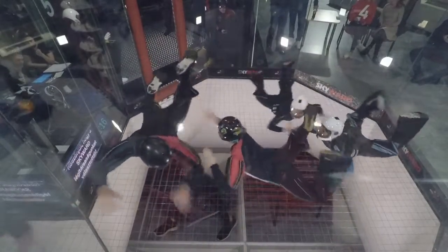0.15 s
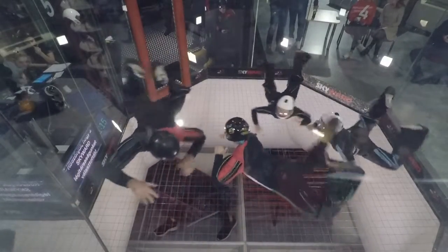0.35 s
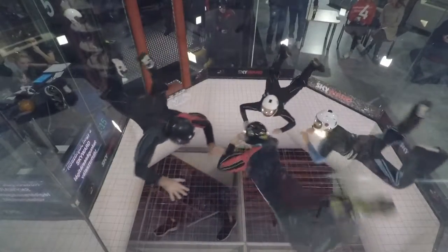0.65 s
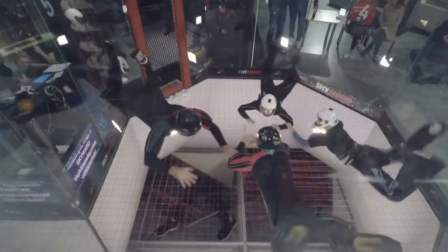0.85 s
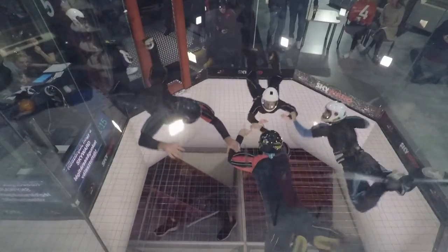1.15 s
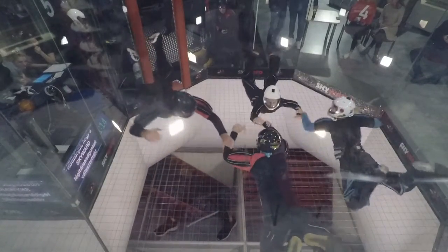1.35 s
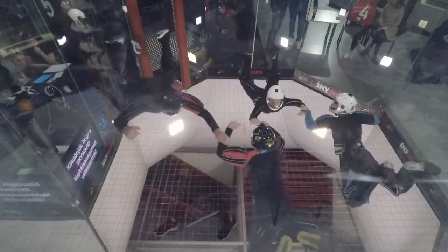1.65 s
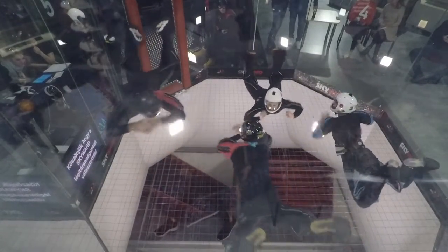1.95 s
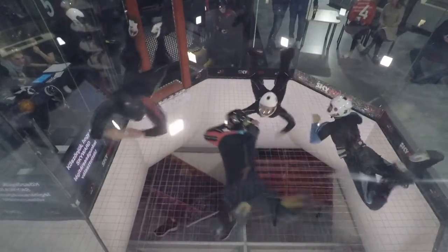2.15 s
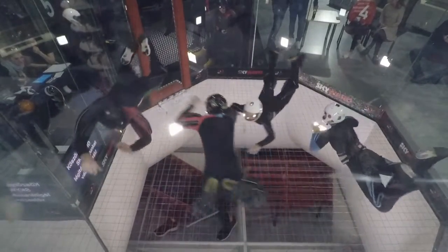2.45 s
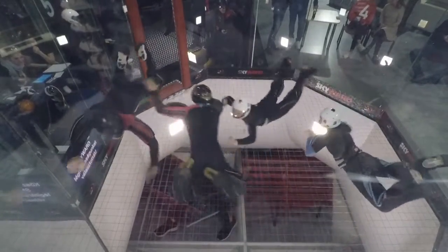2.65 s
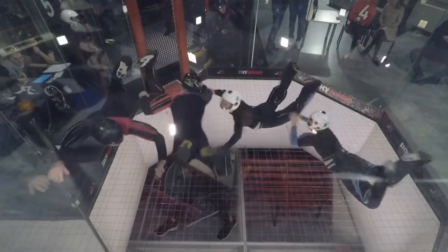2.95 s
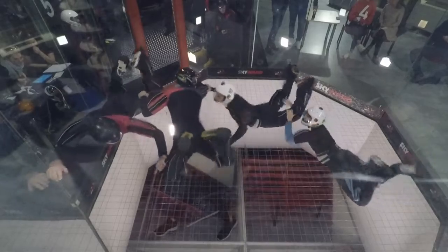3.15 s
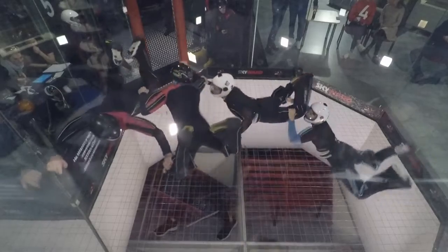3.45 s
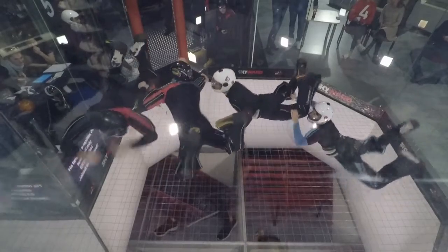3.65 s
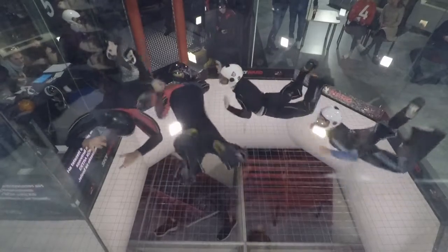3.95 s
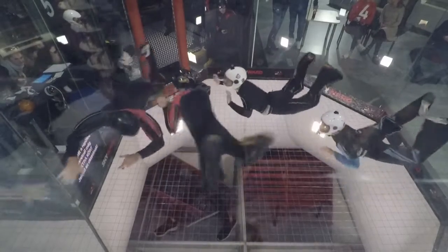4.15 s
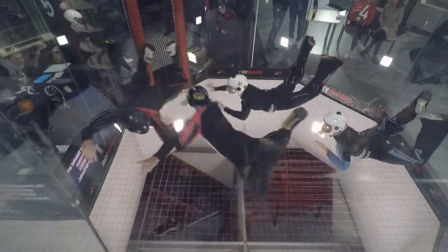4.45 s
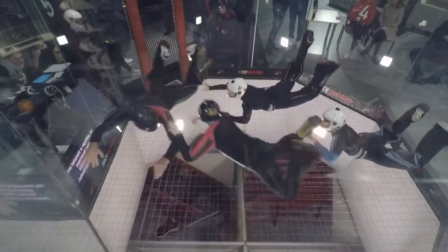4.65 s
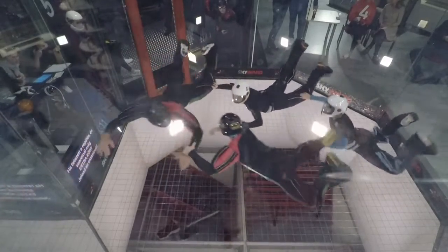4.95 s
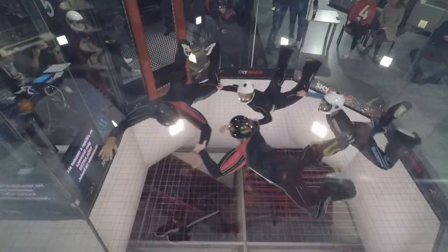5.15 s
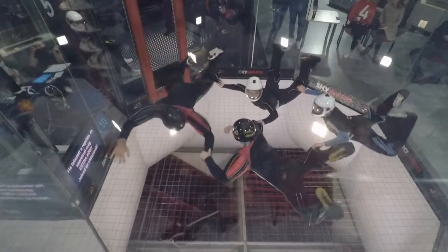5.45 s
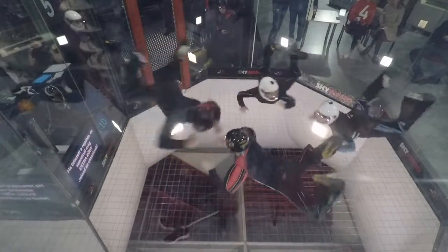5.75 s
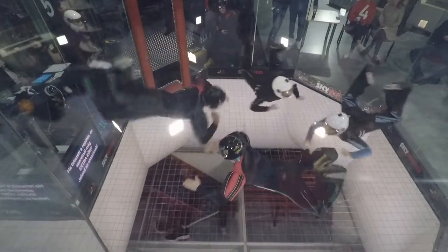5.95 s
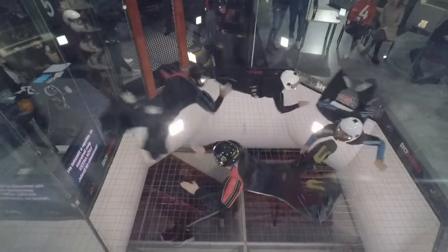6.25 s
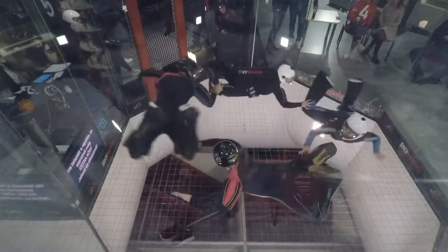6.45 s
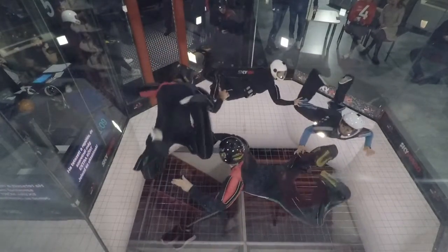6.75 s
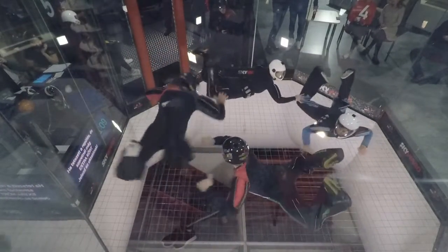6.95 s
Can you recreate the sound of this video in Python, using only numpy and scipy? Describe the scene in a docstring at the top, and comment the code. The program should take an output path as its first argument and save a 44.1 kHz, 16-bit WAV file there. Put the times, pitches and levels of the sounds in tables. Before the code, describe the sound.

From start to end, about seven seconds, air roars through a vertical wind tunnel at a steady speed. The sound is loud, deep and muffled, as the microphone sits in a closed housing at the chamber glass. The duct booms and flutters, with brief low swells around 0.8, 3.3 and 5 seconds. A low, wavering fan hum runs underneath and grows stronger from about 4 seconds on. Close by, a loose part ticks lightly and sharply throughout, roughly fifteen times a second, in an uneven rattle with short gaps, sparser between about 1.3 and 2.2 seconds. Just after 2 seconds, two brief, faint, high whistles of air follow one another. Very faint puffs of high hiss recur a little more than half a second apart, almost buried in the roar. The rush eases only slightly at the end.

```python
"""Air roaring through a vertical wind tunnel at steady speed, booming in the resonances of the duct.
The microphone sits in a closed camera housing at the glass of the flying chamber; the housing muffles
the treble. The fans hum at their blade rate, and the same vibration makes a loose part tick close by,
mostly twice per shaft turn. Two brief whistles and faint puffs of hiss lie under the roar."""
import sys
import numpy as np
from scipy import signal
from scipy.fft import rfft, irfft
from scipy.io import wavfile
from scipy.ndimage import uniform_filter1d, minimum_filter1d

SR = 44100
rng = np.random.default_rng(int(sys.argv[2]) if len(sys.argv) > 2 else 0)


def store_pcm(level_fs):
    """Save levels as 16-bit WAV."""
    pcm = np.round(np.clip(level_fs, -1, 1) * 32767).astype(np.int16)
    wavfile.write(sys.argv[1], SR, np.atleast_2d(pcm).T)


N = 312669

BLADE_HZ = 72.33  # fan blades passing per second


def undb(db):
    """Decibels to gain."""
    return 10 ** (np.asarray(db) / 20)


def bell(x, centre, width):
    """A smooth hump, 1 at the centre and 1/2 at half a width from it."""
    return 2. ** -(2 * (x - centre) / width) ** 2


def drift(rate_hz):
    """A smooth random wander with spread 1: levels held for 1 / rate_hz seconds and slewed twice."""
    hold = max(int(SR / rate_hz), 1)
    steps = np.repeat(rng.standard_normal(N // hold + 1), hold)
    smooth = uniform_filter1d(uniform_filter1d(steps, hold), hold)[:N]
    return smooth / smooth.std()


def shaped_noise(gain):
    """Noise with the given amplitude per root Hz on the frequency axis of rfft."""
    return irfft(rfft(rng.standard_normal(N)) * gain, N) * np.sqrt(SR / 2)


def noise_band(f, hz, width_hz):
    """A bell-shaped band of noise with rms 1."""
    band = shaped_noise(bell(f, hz, width_hz))
    return band / band.std()


def air_roar(f, t, gust_db=0.33, flicker_db=.5):
    """Turbulence coloured by duct and housing; it swells as a whole and eddies make each octave flicker."""
    # Turbulent air behind the housing wall. Each row: frequency in Hz, level in dB per Hz.
    air_spectrum = [(12, -42), (25, -40), (100, -43), (300, -43.5), (500, -47.5), (780, -45.5),
                    (1020, -48.5), (1200, -57.5), (1900, -72), (3400, -83.5), (4900, -81), (6200, -99),
                    (8000, -103), (15000, -105)]
    # Weaker resonances and notches of the duct. Each row: centre in Hz, width in Hz, lift in dB.
    duct_colour = [(40.8, 6.2, 8.5), (88.3, 10, 3), (100, 6.3, -7), (162.4, 16, -5), (239, 15, 0),
                   (292, 17, 1), (314.4, 16, 5), (378.5, 9.1, 3), (1090, 150, 1.2)]
    # Resonances of the housing's air and walls. Each row: centre in Hz, width in Hz, lift in dB.
    housing_colour = [(1765, 100, 4), (2270, 230, 4.5), (3010, 420, 6), (4305, 800, 7)]
    # Strength of the rush as the flyers move through the stream. Each row: time in seconds, gain in dB.
    flow = [(0, 0), (1.3, 0.1), (2.3, 0), (2.9, -0.5), (3.25, 0.5), (3.7, -0.7), (4.2, -1), (4.8, -0.5),
            (6.4, -0.05), (7.09, -1.5)]
    hz, db = np.transpose(air_spectrum)
    octave = np.log2(np.maximum(f, 1))
    colour_db = np.interp(octave, np.log2(hz), db)
    for centre, width, lift_db in duct_colour + housing_colour:
        colour_db = colour_db + lift_db * bell(f, centre, width)
    rush = 0
    for k in range(3, 15):  # octaves from 8 Hz up
        band = shaped_noise(undb(colour_db) * (np.floor(octave) == k))
        rush = rush + band * undb(flicker_db * drift(11))
    flow_db = np.interp(t, *np.transpose(flow))
    return rush * undb(flow_db + gust_db * drift(3.59))


def duct_buffeting(f, t, settle_s=0.097, swell_db=1.2):
    """Turbulence pumps the duct's strongest resonances; a large eddy takes hold of one for a moment."""
    # The three booming resonances. Each row: centre in Hz, width in Hz, level in dB.
    duct_modes = [(43.3, 17.4, -19.5), (181.6, 10.6, -26.5), (252.4, 24.3, -27)]
    # Large eddies and lulls, each felt by the resonance nearest in pitch.
    # Each row: middle in seconds, length in seconds, frequency in Hz, lift in dB.
    eddies = [(.05, .1, 43, 7), (.78, .13, 181, 10), (.79, .08, 250, 8), (.86, .08, 43, -9),
              (1.02, .2, 181, 7.5), (1.3, .16, 181, -9), (1.54, .15, 43, 7), (2.12, .45, 181, 6),
              (2.46, .18, 250, 7), (2.89, .11, 43, 8), (3.02, .08, 43, -9), (3.28, .12, 250, 8),
              (3.305, .1, 181, 10.5), (3.44, .12, 43, 5), (3.96, .1, 181, -7), (4.29, .1, 181, 7),
              (4.47, .14, 181, -8), (4.565, .08, 250, 8.5), (4.99, .12, 181, 10.5), (5.475, .08, 250, 10),
              (6.6, .08, 250, 7), (6.73, .11, 43, 7.5), ]
    pitches = np.array(duct_modes)[:, 0]
    boom = 0
    for k, (hz, width, db) in enumerate(duct_modes):
        drone = noise_band(f, hz, width)
        felt = [(bell(t, middle, length), lift_db) for middle, length, eddy_hz, lift_db in eddies
                if np.argmin(abs(pitches - eddy_hz)) == k]
        hold = np.minimum(sum(hump for hump, _ in felt), 1)
        eddy_db = sum(hump * lift_db for hump, lift_db in felt)
        # between eddies the drone flutters at random; in the hold of one it rings evenly
        instant_power = abs(signal.hilbert(drone)) ** 2 / 2
        mean_power = uniform_filter1d(instant_power, int(settle_s * SR))
        power = hold * instant_power + (1 - hold) * mean_power
        wander_db = (1.5 - hold) * swell_db * drift(7.4)
        boom = boom + drone / np.sqrt(power) * undb(db + eddy_db + wander_db)
    return boom


def fan_hum(t, wander_rad=.12, waver_db=.6, overtone_waver_db=3):
    """Blade-rate partials; the moving air makes their level and phase waver, the higher ones more."""
    # The body of the hum. Each row: time in seconds, then the levels of partials 1, 2 and 3 in dB.
    hum_levels = [(0, -25, -26.5, -40), (.3, -26, -23, -35), (.5, -32, -22, -34), (.9, -26, -22, -31),
                  (1.35, -37, -26, -40), (1.7, -26, -26.5, -35), (2.1, -29, -23.5, -25.5),
                  (2.7, -23.5, -27.5, -25), (2.9, -23, -34, -28.5), (3.3, -24, -25, -34),
                  (3.65, -21, -24.5, -29.5), (4.1, -20, -25, -42), (4.4, -21.5, -27, -44),
                  (4.7, -25, -22.5, -42), (4.9, -21, -24, -38), (5.3, -19.5, -25.5, -46),
                  (5.55, -16.5, -24.5, -40), (5.9, -19, -26, -38), (6.2, -16.5, -24.5, -38),
                  (6.7, -18.5, -30, -40), (7.09, -18.5, -26, -37)]
    # Weaker partials. Each row: multiple of the blade rate, level in dB.
    overtones = [(5, -37.5), (6, -40), (8, -44), (9, -39)]

    def partial(order, db, spread_db):
        """One wavering harmonic of the blade rate."""
        phase = 2 * np.pi * (order * BLADE_HZ * t + rng.random()) + wander_rad * order * drift(2.98)
        return np.sqrt(2) * undb(db + spread_db * drift(4.97)) * np.sin(phase)

    times, *levels_db = np.transpose(hum_levels)
    body = sum(partial(order, np.interp(t, times, db), waver_db * order)
               for order, db in enumerate(levels_db, 1))
    return body + sum(partial(round(order), db, overtone_waver_db) for order, db in overtones)


def blade_shakes(t, first_blade_s=.0041, edge_drop_db=7, uneven_db=0.16,
                 faint_share=.14, faint_db=-54, scatter_db=3):
    """Passing blades shake the loose part, hardest mid-clack, faintly now and then: rows of seconds, dB."""
    # Clacks, a tick for each blade that passes while the part touches.
    # Each row: middle in seconds, length in seconds, relative strength in dB.
    clacks = [(0.052, 0.026, -45), (0.129, 0.015, -52), (0.207, 0.022, -42.5), (0.26, 0.021, -37.5),
              (0.33, 0.028, -40), (0.393, 0.034, -37.5), (0.465, 0.027, -37), (0.521, 0.026, -40),
              (0.607, 0.022, -35.5), (0.668, 0.015, -51), (0.715, 0.024, -49), (0.813, 0.028, -38),
              (0.878, 0.021, -37.5), (0.94, 0.03, -39.5), (1.007, 0.025, -38.5), (1.07, 0.034, -37.5),
              (1.15, 0.019, -38), (1.207, 0.018, -41), (1.266, 0.023, -38), (1.341, 0.02, -46),
              (1.539, 0.015, -47), (1.589, 0.023, -39), (1.715, 0.028, -38), (1.816, 0.015, -51),
              (1.858, 0.019, -46), (1.991, 0.021, -47), (2.075, 0.018, -46), (2.134, 0.014, -52),
              (2.203, 0.02, -39.5), (2.267, 0.026, -38), (2.329, 0.023, -41.5), (2.39, 0.022, -41),
              (2.47, 0.031, -40.5), (2.533, 0.017, -40), (2.6, 0.021, -40), (2.672, 0.035, -38),
              (2.738, 0.02, -38), (2.804, 0.028, -39.5), (2.866, 0.018, -43), (3.018, 0.016, -50),
              (3.108, 0.026, -43), (3.237, 0.018, -39.5), (3.295, 0.02, -38.5), (3.356, 0.034, -43.5),
              (3.503, 0.016, -50), (3.574, 0.034, -44), (3.634, 0.022, -43), (3.7, 0.02, -38),
              (3.764, 0.023, -38.5), (3.834, 0.04, -50), (3.906, 0.022, -38.5), (4.046, 0.022, -41.5),
              (4.117, 0.022, -40), (4.187, 0.024, -38.5), (4.246, 0.019, -41), (4.317, 0.016, -42),
              (4.37, 0.019, -43.5), (4.429, 0.015, -49), (4.561, 0.026, -42), (4.627, 0.03, -43.5),
              (4.692, 0.018, -43.5), (4.745, 0.015, -45), (4.816, 0.017, -40.5), (4.887, 0.02, -41.5),
              (4.957, 0.026, -39.5), (5.02, 0.018, -39), (5.161, 0.019, -42), (5.219, 0.023, -40),
              (5.3, 0.015, -48), (5.355, 0.016, -43), (5.448, 0.018, -44), (5.516, 0.025, -41.5),
              (5.569, 0.028, -40.5), (5.636, 0.023, -40), (5.791, 0.022, -42), (5.859, 0.031, -41.5),
              (5.91, 0.025, -41), (5.999, 0.028, -39), (6.068, 0.024, -38.5), (6.122, 0.031, -42),
              (6.186, 0.018, -45), (6.267, 0.018, -45), (6.339, 0.023, -39), (6.402, 0.027, -43),
              (6.465, 0.027, -40.5), (6.541, 0.023, -42), (6.678, 0.017, -40), (6.746, 0.022, -42.5),
              (6.862, 0.017, -42), (6.902, 0.019, -44), (6.973, 0.017, -45)]
    blades = int((t[-1] - first_blade_s) * BLADE_HZ)
    when = first_blade_s + np.arange(blades) / BLADE_HZ
    size = rng.standard_normal(blades)
    touches = rng.random(blades) < faint_share
    level_db = np.where(touches, faint_db + scatter_db * size, -np.inf)
    for middle, length, db in clacks:
        offset = abs(2 * (when - middle) / length)  # 1 at the edge of the clack
        clack_db = db - edge_drop_db * offset ** 3 + uneven_db * size
        level_db = np.where(offset < 2, np.maximum(level_db, clack_db), level_db)
    return np.column_stack([when, level_db])[np.isfinite(level_db)]


def loose_part_rattle(t, gain_db=1.5, snap_share=.74, scrape_s=0.001, chatter_db=-30, chatter_s=.016,
                      jitter_s=.0005, build_cycles=4):
    """Sharp contacts ring a loose part near the microphone, each a little before or after its blade."""
    # The part's modes. Each row: frequency in Hz, relative level in dB, seconds to fall by 60 dB.
    part_modes = [(2330, 5.5, .013), (2850, 23.5, .004), (3700, 10.3, .0135), (4370, 12.3, .013),
                  (5180, 6, .006), (5570, -1, .015), (5980, 6, .0037), (6570, -4.5, .0075),
                  (7180, -9, .014), (7870, -7.5, .009), (8840, -8, .0065), (9940, 6.5, .0054),
                  (10780, -1.7, .0058), (11530, -3.5, .0078), (12500, 4, .0043), (13840, -8, .006),
                  (14610, -11.5, .0077), (15260, -15, .01)]
    age = t[:2048]
    # each contact snaps, scrapes for an instant, then chatters away faintly
    friction = np.exp(-age / scrape_s) + undb(chatter_db) * np.exp(-age / chatter_s)
    force = np.zeros(N + len(age))
    for when, db in blade_shakes(t):
        scrape = friction * rng.standard_normal(len(age))
        contact = np.sqrt(1 - snap_share) * scrape / np.linalg.norm(scrape)
        contact[0] += np.sqrt(snap_share)
        start = int(np.clip((when + jitter_s * rng.standard_normal()) * SR, 0, N))
        force[start:start + len(age)] += undb(db) * contact
    ring = 0
    for k, (hz, db, t60) in enumerate(part_modes):
        build = 1 - np.exp(-age * hz / build_cycles)
        decay = np.exp(-np.log(1000) * age / t60)
        ring = ring + (-1) ** k * undb(db) * np.sin(2 * np.pi * hz * age) * build * decay
    return undb(gain_db) * signal.fftconvolve(force, ring)[:N]


def edge_whistles(t, waver_hz=12):
    """Air sings briefly on an edge, easing in and out, a little higher as it grows louder."""
    # Each row: peak time in seconds, fade time in seconds, top pitch in Hz, sag in Hz, peak level in dB.
    whistles = [(2.08, .11, 2972, 70, -45.3), (2.18, .035, 2630, 25, -51)]
    song = 0
    for peak_s, fade_s, hz, sag_hz, db in whistles:
        strength = np.exp(-((t - peak_s) / fade_s) ** 2)
        pitch = hz - sag_hz * (1 - strength ** 2) + waver_hz * drift(120)
        phase = 2 * np.pi * np.cumsum(pitch) / SR
        song = song + np.sqrt(2) * undb(db) * strength * np.sin(phase)
    return song


def hiss_puffs(f, t, first_s=.33, period_s=.605):
    """A faint hiss that comes in short puffs at an even pace, a narrow band on a wide skirt."""
    # One puff: fade time in seconds, centre in Hz, width in Hz, band level in dB, skirt level in dB.
    puff_shape = (0.06, 6950, 750, -66, -67.5)
    fade_s, hz, width, band_db, skirt_db = puff_shape
    puffs = sum(np.exp(-((t - peak_s) / fade_s) ** 2) for peak_s in np.arange(first_s, t[-1], period_s))
    narrow = undb(band_db) * noise_band(f, hz, width)
    skirt = undb(skirt_db) * noise_band(f, hz=10500, width_hz=8000)
    return puffs * (narrow + skirt)


def scene():
    """Roar, buffeting and hum at the chamber glass, with the small sounds close to the microphone; mono."""
    t, f = np.arange(N) / SR, np.fft.rfftfreq(N, 1 / SR)
    tunnel = air_roar(f, t) + duct_buffeting(f, t) + fan_hum(t)
    close_by = edge_whistles(t) + hiss_puffs(f, t) + loose_part_rattle(t)
    return (tunnel + close_by)[None]


def record(dry):
    """The camera drops the deepest rumble, eases its gain down around the highest peaks and cuts the top."""
    low_cut_hz, top_hz = 14, 15600
    ceiling, span = .88, 441  # the limiter's peak amplitude and its smoothing in samples
    low_cut = signal.butter(3, low_cut_hz, "highpass", fs=SR, output="sos")
    top_cut = signal.ellip(8, .2, 70, top_hz, fs=SR, output="sos")
    heard = signal.sosfilt(low_cut, dry)
    held_gain = minimum_filter1d(ceiling / np.maximum(abs(heard), ceiling), 2 * span)
    smooth_gain = uniform_filter1d(uniform_filter1d(held_gain, span), span)
    return signal.sosfilt(top_cut, heard * smooth_gain)


dry = scene()
out = record(dry)
store_pcm(out)
```